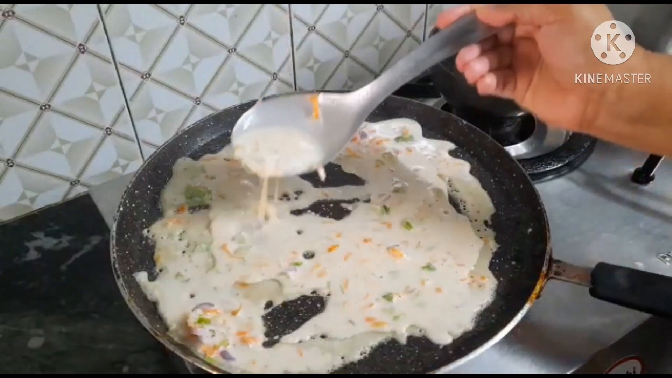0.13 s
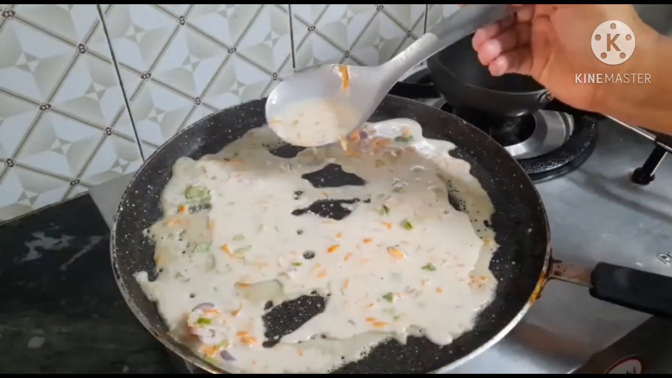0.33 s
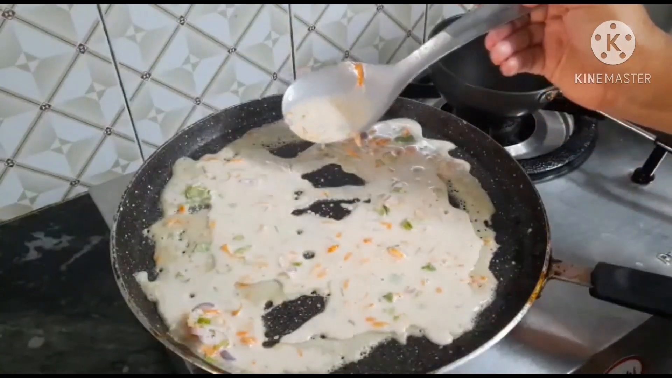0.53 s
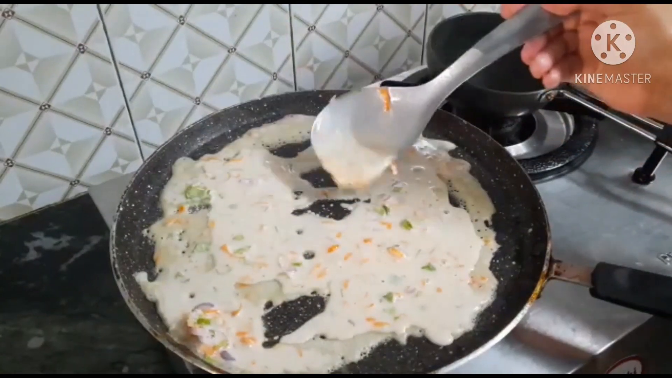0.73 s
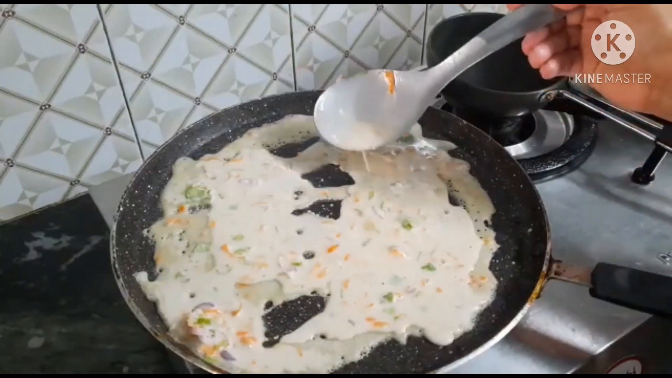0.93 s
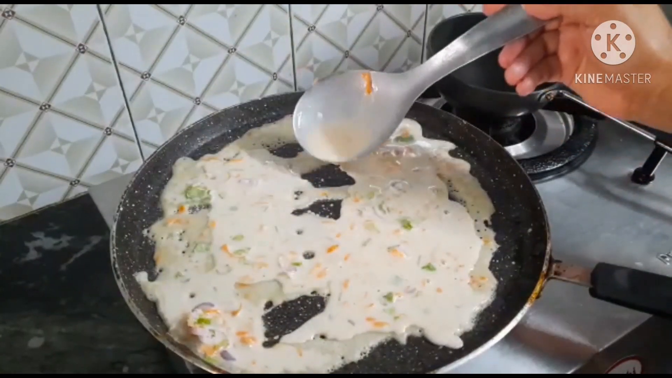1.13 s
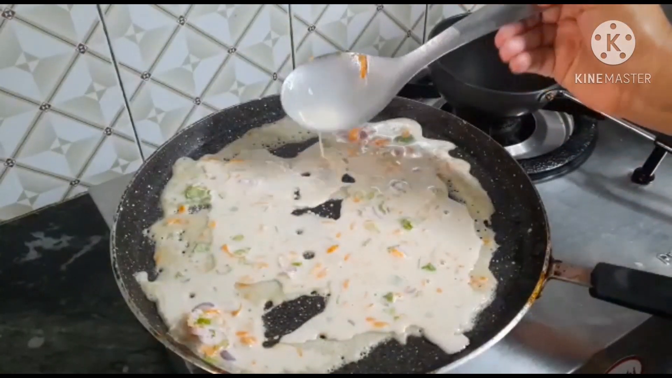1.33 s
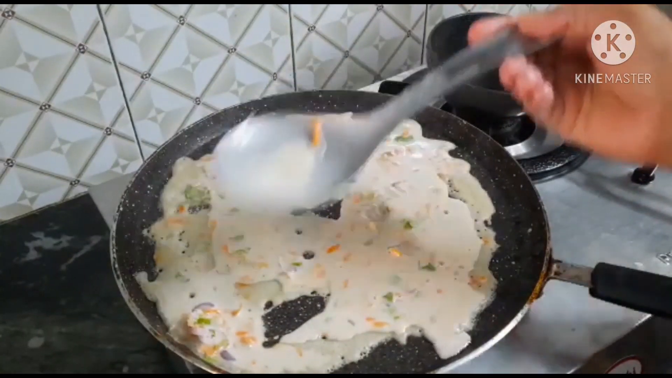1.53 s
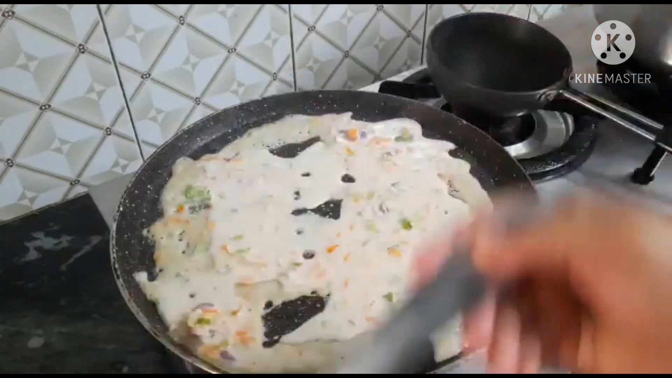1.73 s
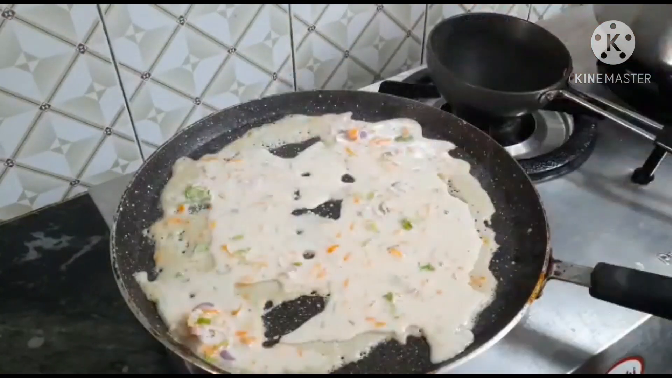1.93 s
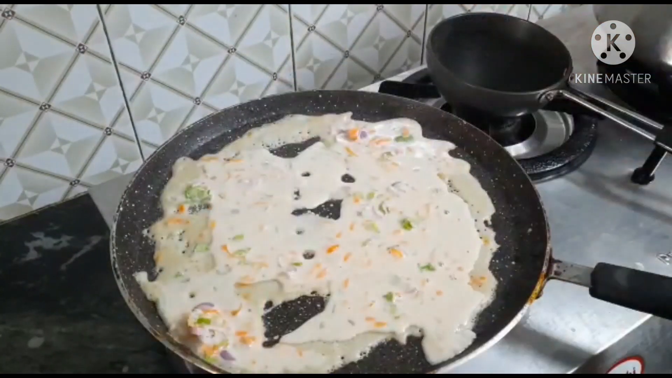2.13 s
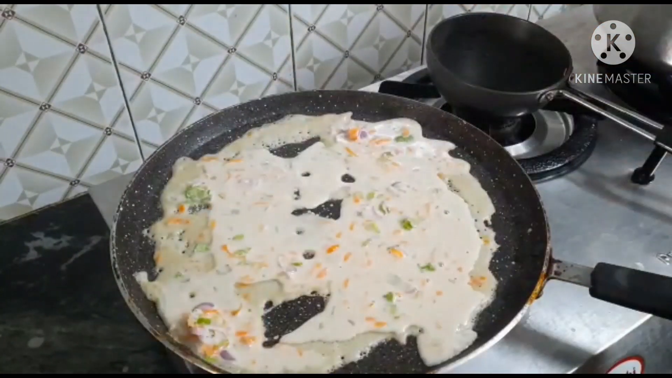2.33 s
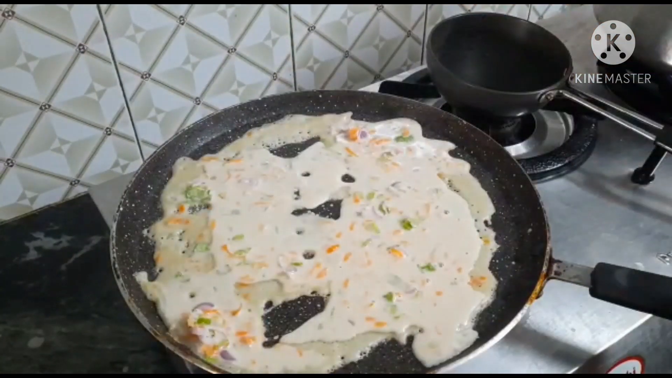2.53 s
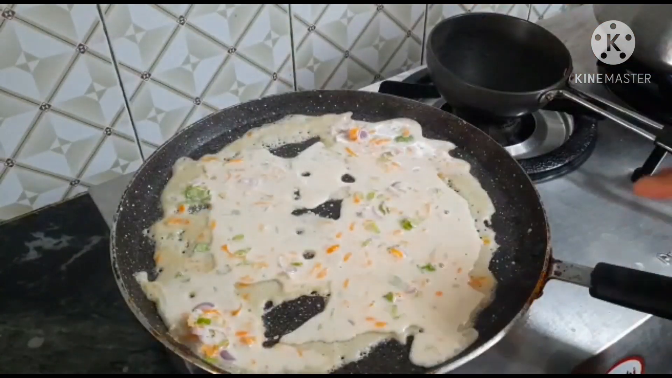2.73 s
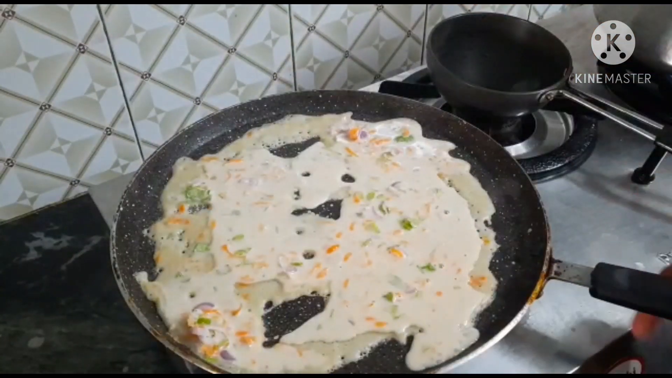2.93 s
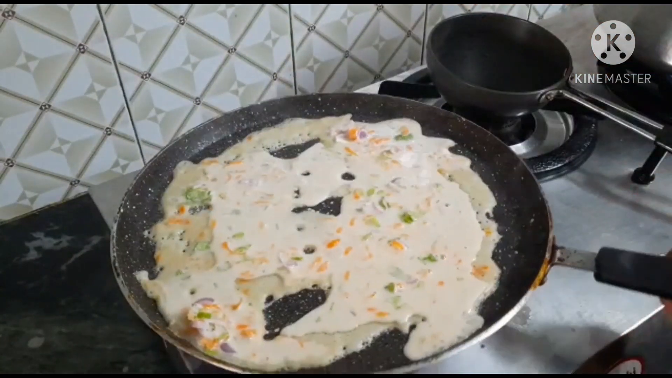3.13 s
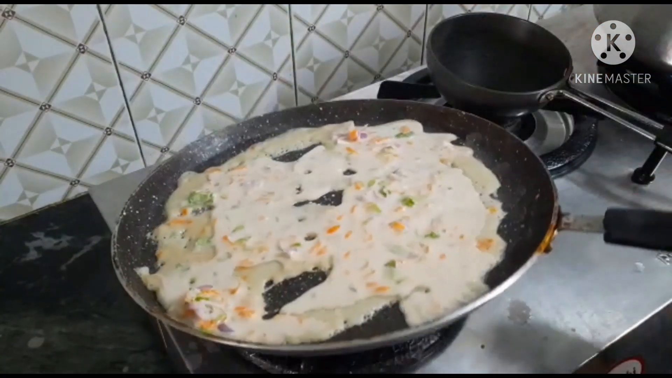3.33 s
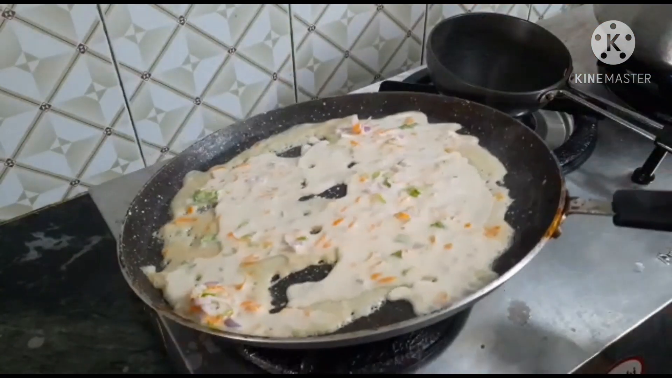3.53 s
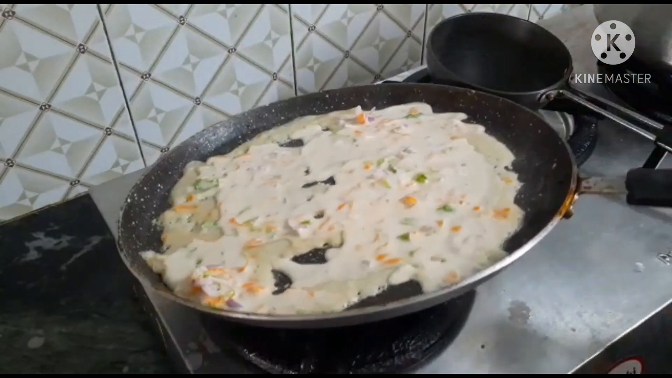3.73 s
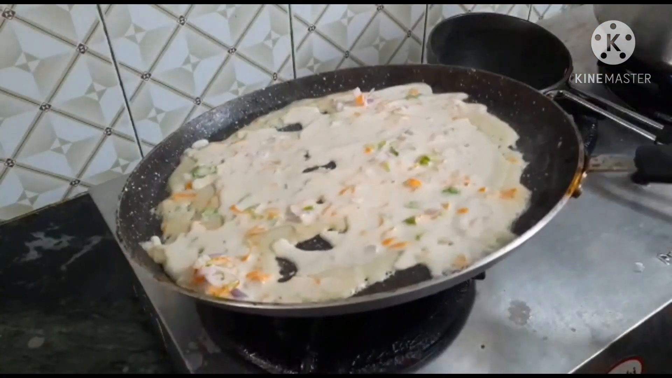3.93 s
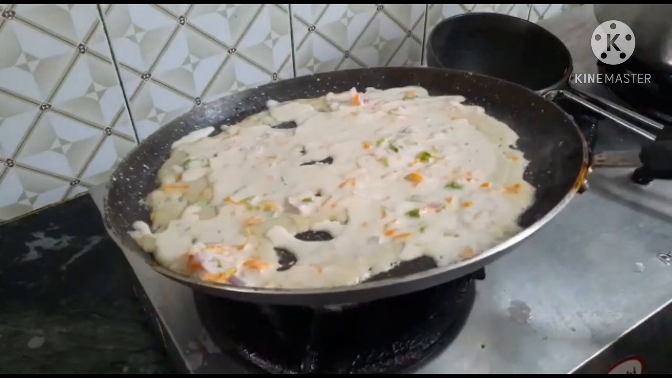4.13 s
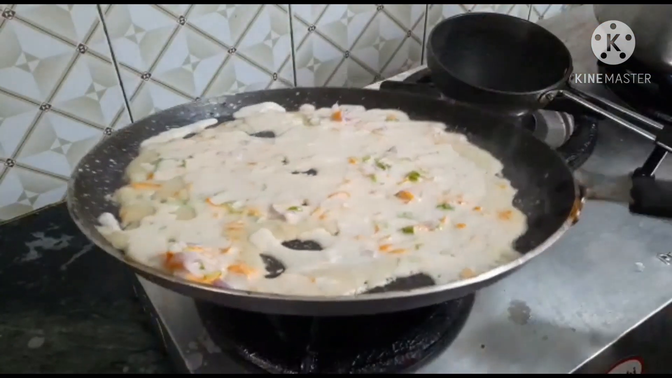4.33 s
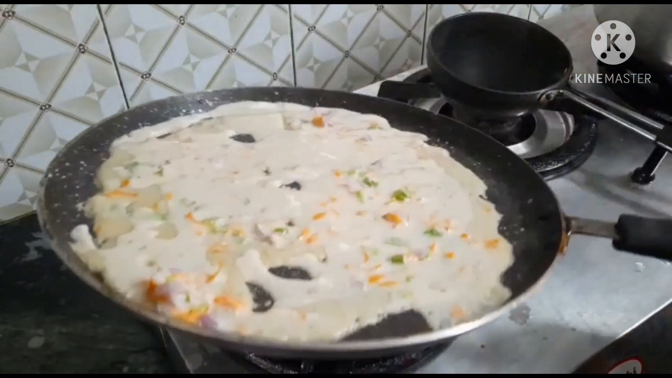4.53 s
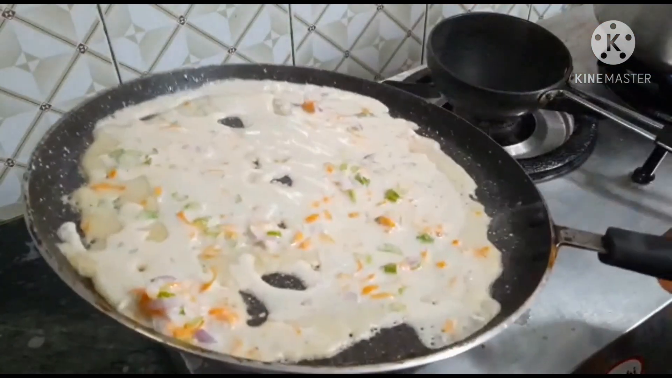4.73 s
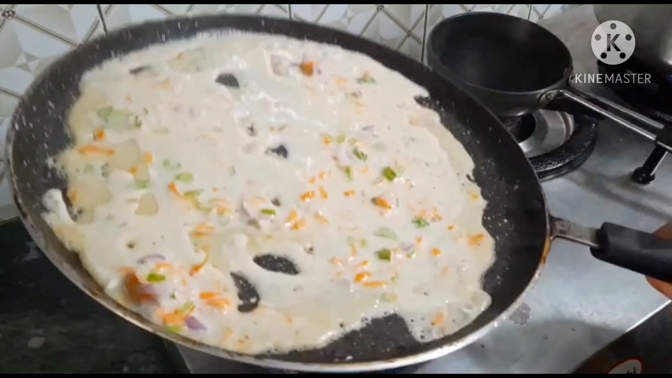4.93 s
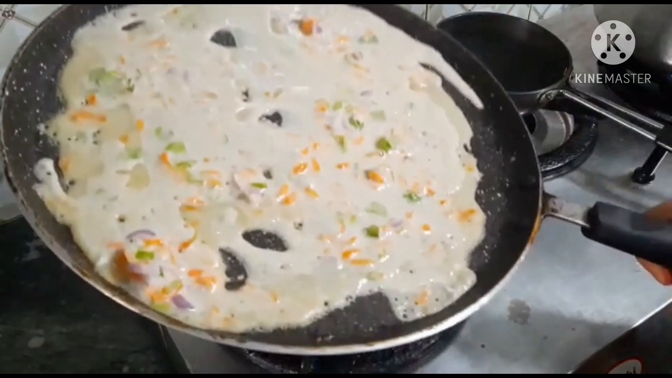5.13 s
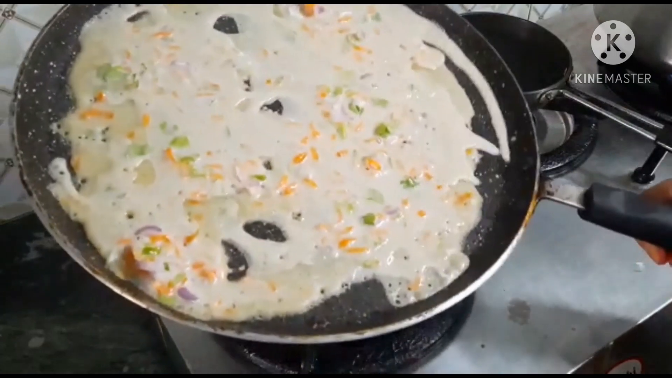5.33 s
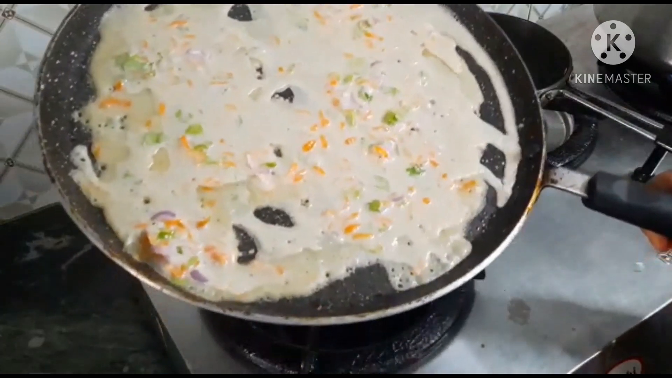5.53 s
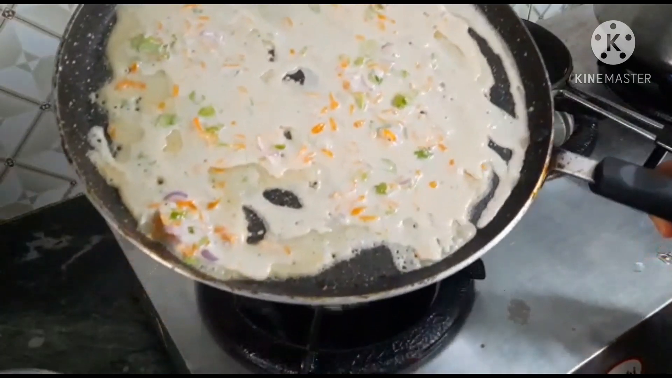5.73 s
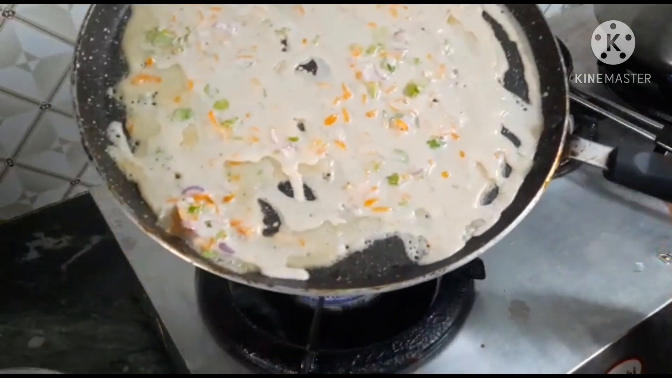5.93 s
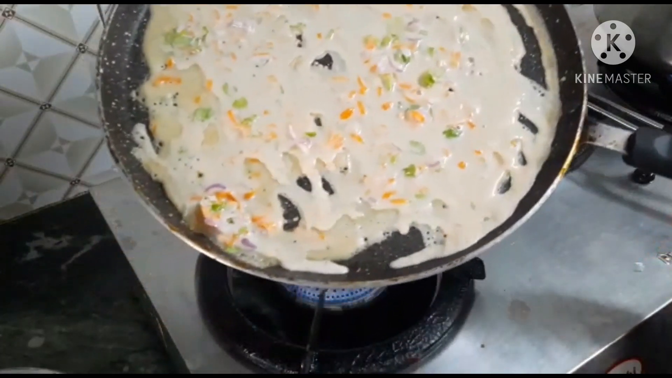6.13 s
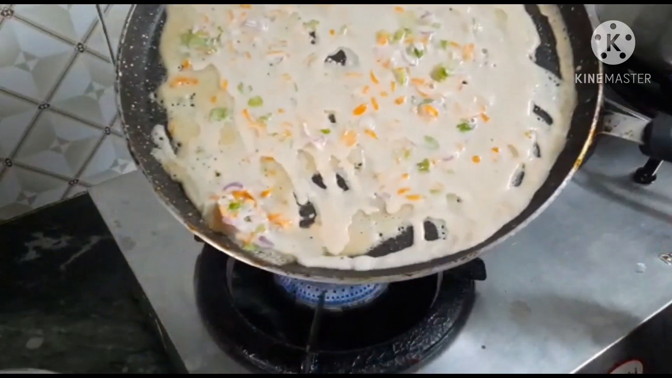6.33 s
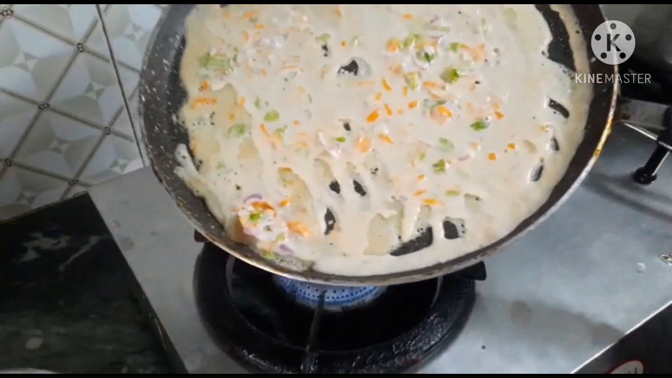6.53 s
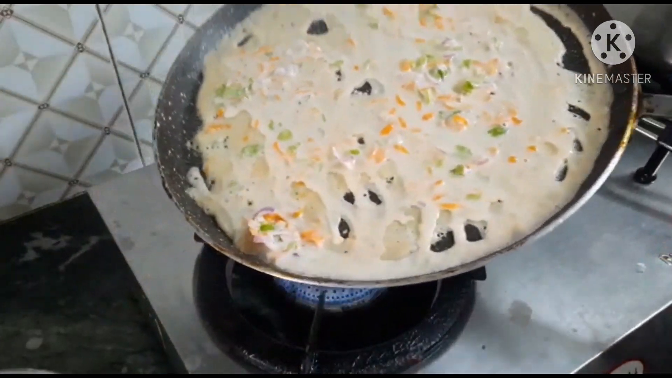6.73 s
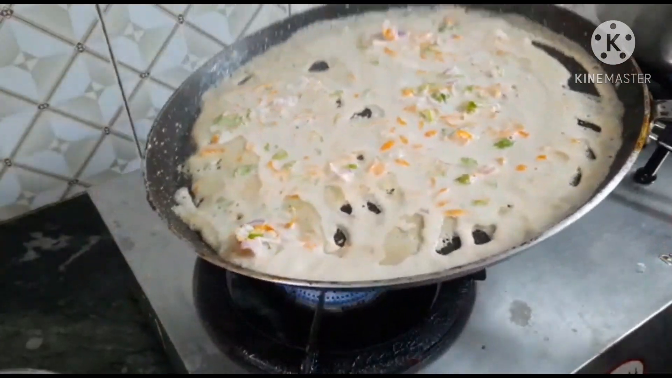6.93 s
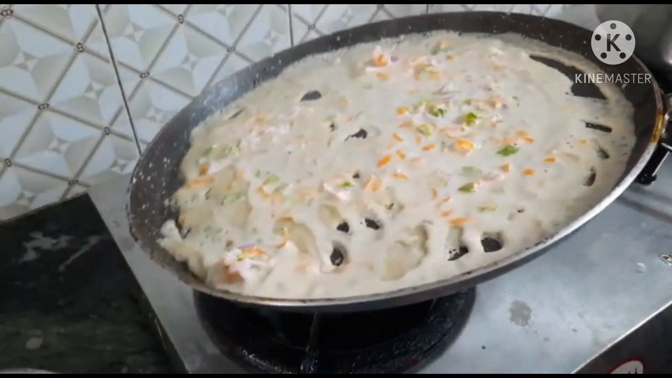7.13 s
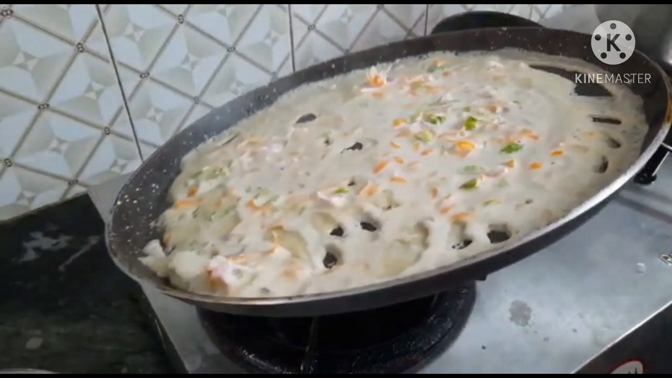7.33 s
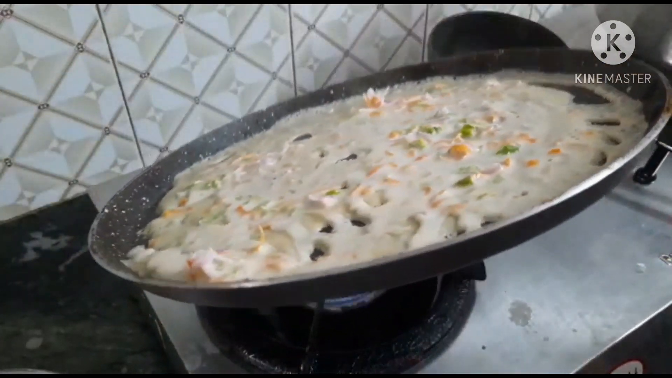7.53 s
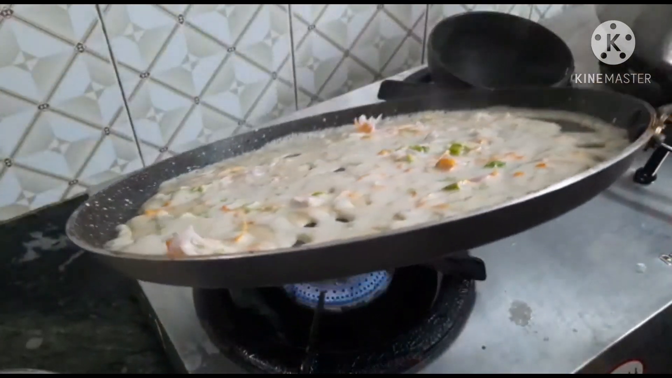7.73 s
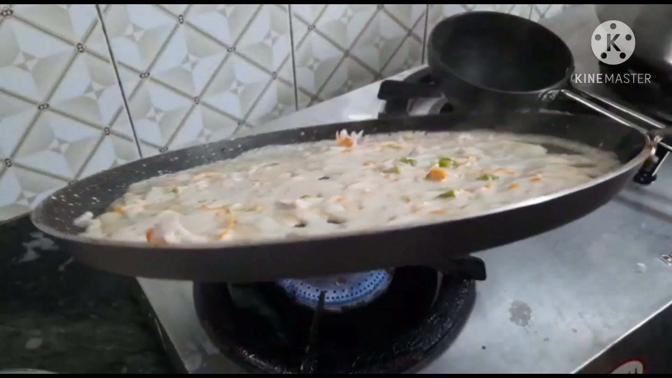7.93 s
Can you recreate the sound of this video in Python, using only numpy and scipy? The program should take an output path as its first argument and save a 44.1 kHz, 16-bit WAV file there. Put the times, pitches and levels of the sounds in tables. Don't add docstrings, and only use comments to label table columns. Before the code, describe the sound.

Thin batter sizzles softly on a hot pan, a metal ladle clanks loudly, then crackling oil spits as the sizzle swells and eases.

```python
import sys
import numpy as np
from scipy import signal
from scipy.fft import rfft, irfft
from scipy.io import wavfile

SR = 44100
rng = np.random.default_rng(int(sys.argv[2]) if len(sys.argv) > 2 else 0)


def store_pcm(level_fs):
    pcm = np.round(np.clip(level_fs, -1, 1) * 32767).astype(np.int16)
    wavfile.write(sys.argv[1], SR, np.atleast_2d(pcm).T)


def linear_from_db(decibels):
    return 10 ** (np.asarray(decibels, float) / 20)


N = 356724

# time in seconds, steam level in dB, oil spatter level in dB.
FRYING = [(0.0, -45, -61), (0.52, -47, -63.5), (0.67, -46, -63), (1.01, -50.5, -66), (1.71, -46.5, -60.5),
          (2.03, -47, -63), (2.46, -46.5, -60.5), (2.79, -47, -59), (3.31, -47.5, -59), (3.7, -46, -56),
          (4.08, -47, -57), (4.82, -44.5, -52.5), (5.5, -44.5, -50), (5.83, -39, -47.5),
          (6.08, -38.5, -47.5), (6.53, -38.5, -48), (7.89, -45.5, -53.5), (8.09, -45.5, -54)]
# frequency in Hz, density in dB per Hz.
STEAM_ROAR = [(700, -26), (1000, -15), (1250, -4), (1600, -2), (2050, -2.5), (2650, -2.5), (3050, -8.5),
              (3550, -17), (4200, -30.5)]
LARGE_BUBBLES = [(2180, -30.5), (3700, -10.5), (4480, -5), (7000, -3), (9100, -33), (15400, -120)]
SMALL_BUBBLES = [(5200, -11), (6500, -11), (7600, -0.5), (9000, 1), (10600, -1), (11800, -6), (13200, -13),
                 (15000, -28)]
FINE_SPRAY = [(11000, -26), (12500, -9), (13800, -5), (15000, -0.5), (15900, -6)]
# time in seconds, level in dB.
HUM_LEVEL = [
    (0, -75),
    (1.95, -69.5),
    (2.2, -65),
    (3.9, -64.5),
    (4.35, -71),
    (4.6, -63.5),
    (5.5, -62),
    (6.0, -75),
    (8.09, -77),
]
STEAM_MEAN_DB = -46


def rms_one(x):
    return x / np.sqrt(np.mean(x ** 2) + 1e-20)


def in_time(rows):
    s, *columns = np.transpose(rows)
    return [np.interp(np.arange(N) / SR, s, c) for c in columns]


def drift(rate_hz):
    r = np.exp(-2 * np.pi * rate_hz / SR)
    noise = rng.standard_normal(N + SR)
    return rms_one(signal.lfilter([1], [1, -2 * r, r * r], noise)[SR:])


def colour(x, spectrum):
    size = 8192
    hz, db = np.transpose(spectrum)
    hz = np.r_[hz[0] / 2, hz, hz[-1] * 2]
    db = np.r_[db[0] - 40, db, db[-1] - 40]
    log_hz = np.log(np.maximum(np.arange(size // 2 + 1), 1) * SR / size)
    cepstrum = irfft(np.log(linear_from_db(np.interp(log_hz, np.log(hz), db))))
    cepstrum[1:size // 2] *= 2
    cepstrum[size // 2 + 1:] = 0
    return signal.fftconvolve(x, irfft(np.exp(rfft(cepstrum))))[:len(x)]


def resonate(x, peaks, order=1):
    out = 0
    for k, (hz, width_hz, db) in enumerate(peaks):
        r = np.exp(-np.pi * max(width_hz, 3) / SR)
        section = [(1 - r * r) / 2, 0, (r * r - 1) / 2, 1, -2 * r * np.cos(2 * np.pi * hz / SR), r * r]
        sign = (-1) ** (k * order)
        out = out + sign * linear_from_db(db) * signal.sosfilt([section] * order, x)
    return out


def echo(tail_db, t60, size):
    t = np.arange(size) / SR
    air = signal.butter(3, 12500, fs=SR, output="sos")
    noise = signal.sosfilt(air, rng.standard_normal(size))
    low = signal.sosfilt(signal.butter(2, 6500, fs=SR, output="sos"), noise)
    tail = low * linear_from_db(-60 * t / t60) + (noise - low) * linear_from_db(-60 * t / (0.3 * t60))
    out = linear_from_db(tail_db) * (1 - np.exp(-t / 0.0032)) * tail
    out[0] = 1
    return out


def tiled_walls(x, tail_db, t60, wander_db, count):
    spots = [linear_from_db(wander_db * drift(1.0)) for k in range(count)]
    total = np.sqrt(sum(spot ** 2 for spot in spots))
    out = 0
    for k, spot in enumerate(spots):
        part = np.roll(x, k * N // count)
        out = out + spot / total * signal.fftconvolve(part, echo(tail_db, t60, size=16000))[:N]
    return rms_one(out)


def bursts(per_s, spread_db, clump_db):
    sizes = linear_from_db(spread_db * np.minimum(rng.exponential(1, N), 5)) * rng.choice([-1, 1], N)
    born = rng.random(N) < per_s * linear_from_db(clump_db * drift(25)) / SR
    return sizes * born / np.sqrt(per_s)


def knock(hits, body, contact_hz, rise_s):
    size = 24000
    out = np.zeros(N + SR)
    soft = signal.butter(3, contact_hz, fs=SR, output="sos")
    swell = 1 - np.exp(-np.arange(1, size + 1) / SR / rise_s)
    for s, peak_db, tail_db, t60 in hits:
        blow = signal.sosfilt(soft, echo(tail_db, t60, size))
        sound = swell * resonate(blow, body, order=2)
        out[round(s * SR):][:size] += linear_from_db(peak_db) * sound / np.abs(sound).max()
    return out[:N]


def low_pass(x, hz):
    return signal.sosfilt(signal.ellip(12, .5, 60, hz, fs=SR, output="sos"), x)


def sizzle():
    # frequency in Hz, width in Hz, level in dB.
    steam_jet = [(2150, 790, 0)]
    roar_db, oil_db = in_time(FRYING)
    swing_db = oil_db + 58
    grains = rms_one(bursts(2800, spread_db=9.0, clump_db=1.5))
    pops = rms_one(bursts(130., spread_db=3.0, clump_db=4.0))
    hiss = tiled_walls(rng.standard_normal(N), tail_db=-24.5, t60=0.077, wander_db=6.0, count=4)
    surge, sputter = drift(3.7), drift(86)
    layers = ((roar_db, STEAM_ROAR, -9, -14, .3, 1.1),
              (-62.5 + 0.93 * swing_db, LARGE_BUBBLES, -7, -11, .4, .9),
              (-57 + 1.16 * swing_db, SMALL_BUBBLES, -7, -9, .4, 1.1),
              (-71 + 1.3 * swing_db, FINE_SPRAY, -8, -12, .4, .7))
    out = 0
    for level_db, spectrum, grain_db, pop_db, surge_db, sputter_db in layers:
        own_hiss = np.roll(hiss, rng.integers(N))
        source = linear_from_db(grain_db) * grains + linear_from_db(pop_db) * pops + own_hiss
        flicker_db = surge_db * surge + sputter_db * sputter + 0.067 * drift(40)
        out = out + linear_from_db(level_db + flicker_db) * rms_one(colour(source, spectrum))
    jet_db = -61 + 2 * (roar_db - STEAM_MEAN_DB) + 0.46 * sputter
    return out + linear_from_db(jet_db) * rms_one(resonate(hiss[::-1], steam_jet, order=2))


def pour():
    # start in seconds, level in dB, hold in seconds.
    puffs = [
        (0.0, -58, 0.19),
        (0.234, -61.5, 0.042),
        (0.427, -52.5, .27),
        (0.81, -58, 0.034),
        (0.953, -63, .04),
        (1.078, -61.5, .17),
        (1.467, -62, 0.14),
    ]
    # frequency in Hz, width in Hz, level in dB.
    puff_peak = [(9800, 6000, 0)]
    t = np.arange(N) / SR
    level = 0
    for s, db, hold_s in puffs:
        rise = np.clip((t - s) / (0.45 * hold_s), 0, 1)
        fade_db = 90 * np.clip(t - s - hold_s, 0, 1)
        level = level + linear_from_db(db - fade_db) * rise
    spray = rng.standard_normal(N) + linear_from_db(0.5) * rms_one(bursts(900., spread_db=0.5, clump_db=3.5))
    return level * rms_one(resonate(spray, puff_peak, order=2))


def appliance_hum():
    # frequency in Hz, width in Hz, level in dB.
    room_modes = [(58, 7.3, -7.5), (95, 5.3, -4), (113.5, 17, 7), (138, 40, -2)]
    hum_db, = in_time(HUM_LEVEL)
    return linear_from_db(hum_db + drift(3.0)) * rms_one(resonate(rng.standard_normal(N), room_modes))


def gas_ring():
    # frequency in Hz, density in dB per Hz.
    murmur = [(94, -16.5), (160, -7.5), (242, -9.5), (311, -2), (415, -5.5), (523, -7.5), (560, 9),
              (730, -21.5), (1230, -120)]
    # frequency in Hz, density in dB per Hz.
    gas_jets = [(290, -41.5), (500, -19.5), (561, -12), (1070, -8.5), (1150, -12), (1500, -21),
                (2530, -120)]
    swing_db = in_time(FRYING)[0] - STEAM_MEAN_DB
    hum_swing_db = in_time(HUM_LEVEL)[0] + 68
    flame_db = -66.5 + 0.68 * swing_db + 0.35 * hum_swing_db + 0.53 * drift(8.8)
    gas_db = -57 + 0.81 * swing_db + 0.47 * drift(30)
    flame = linear_from_db(flame_db) * rms_one(colour(rng.standard_normal(N), murmur))
    return flame + linear_from_db(gas_db) * rms_one(colour(rng.standard_normal(N), gas_jets))


def far_rumble():
    # frequency in Hz, density in dB per Hz.
    rumble_spectrum = [(13, -46), (22, -32), (43, 8.5), (75, 7), (107, 4.5), (140, -43), (200, -16),
                       (260, -56), (440, -120)]
    return linear_from_db(-78) * rms_one(colour(rng.standard_normal(N), rumble_spectrum))


def tap():
    # frequency in Hz, width in Hz, level in dB.
    tap_modes = [(107, 26, 0), (228, 36, -7), (320, 104, -0.5), (550, 89, -3), (740, 110, -2),
                 (960, 180, -7), (1260, 450, -3)]
    # start in seconds, peak in dB, echo tail in dB, tail T60 in seconds.
    tap_hits = [
        (0.0, -49, -7, 1),
        (4.8895, -31, -29, 0.26),
        (4.915, -33.5, -33, 0.38),
    ]
    return knock(tap_hits, tap_modes, contact_hz=2200, rise_s=.0007)


def drip():
    # frequency in Hz, width in Hz, level in dB.
    drip_modes = [(1160, 77, 5), (1340, 930, 8), (1690, 130, -8), (2220, 750, -1)]
    # start in seconds, peak in dB, echo tail in dB, tail T60 in seconds.
    drip_hits = [
        (.247, -31.5, -26, 0.1),
        (.262, -36, -28, 0.25),
        (.278, -38, -32, 1),
    ]
    return knock(drip_hits, drip_modes, contact_hz=3500, rise_s=0.0027)


def spits():
    # time in seconds, peak in dB, body under 4 kHz in dB.
    clear_spits = [(0.8207, -32, -5), (1.5707, -35, -11), (1.7569, -35, -8), (2.169, -32.5, -9),
                   (2.4384, -40, -5), (2.481, -37, -8), (2.6569, -36, -5), (2.812, -35, -5),
                   (2.8749, -46, -7), (3.3358, -30, -5), (3.384, -33, -5), (3.5252, -28.5, 0),
                   (3.5865, -29.5, -12), (3.7632, -29, 3), (4.181, -24, -1.5), (4.246, -27.5, -3),
                   (4.283, -30, -8), (4.4288, -28, -16), (4.9383, -24, -2.5), (5.3018, -31, -3),
                   (5.4753, -30, 3), (5.5468, -23, -0.5), (5.7202, -25, -9), (5.857, -22, 1),
                   (5.9613, -21.5, -1), (6.098, -24, -5), (6.3087, -23, 1), (6.4097, -19.5, -11),
                   (6.48, -25, -15), (6.7042, -23, 0)]
    oil_db = in_time(FRYING)[1]
    small = np.flatnonzero(rng.random(N) < 14 / SR)
    setting_s = np.maximum(np.arange(N) / SR - 6.9, 0)
    small_db = oil_db + 19 + 6.3 * rng.uniform(-1.3, 1, N) - 12 * setting_s
    rows = [(round(s * SR), db, body_db) for s, db, body_db in clear_spits]
    rows += [(i, small_db[i], -15) for i in small]
    high, low = np.zeros((2, N + SR))
    for i, peak_db, body_db in rows:
        spit = linear_from_db(peak_db) * echo(-12.5, 0.07, size=4000)
        high[i:][:len(spit)] += spit
        low[i:][:len(spit)] += linear_from_db(body_db) * spit
    lag = round(.0026 * SR)
    high = high + linear_from_db(-4.5) * np.roll(high, lag)
    low = low + linear_from_db(-4.5) * np.roll(low, lag)
    out = linear_from_db(9.5) * colour(high, SMALL_BUBBLES) + linear_from_db(-4) * colour(high, LARGE_BUBBLES)
    out = out + linear_from_db(-11) * colour(high, FINE_SPRAY) + linear_from_db(13) * colour(low, STEAM_ROAR)
    return out[:N]


def bowl():
    # frequency in Hz, width in Hz, level in dB.
    bowl_modes = [(104.3, 12, 0.5), (165, 71, -10), (246, 53, -8.5), (405, 85, -6.5), (764, 42, -0.5),
                  (907, 137, 6.5), (1250, 190, -10), (1553, 350, -4), (1885, 250, -7.5), (2410, 440, -10),
                  (3140, 350, -14)]
    # start in seconds, peak in dB, echo tail in dB, tail T60 in seconds.
    bowl_hits = [
        (1.162, -21, -30, 0.26),
        (1.168, -29, -28.5, 0.62),
        (1.184, -26, -36, 0.29),
    ]
    return knock(bowl_hits, bowl_modes, contact_hz=3000, rise_s=0.0016)


def plop():
    # frequency in Hz, width in Hz, level in dB.
    plop_modes = [(556, 46, -1), (4670, 290, -23)]
    # start in seconds, peak in dB, echo tail in dB, tail T60 in seconds.
    plop_hits = [
        (1.630, -40.5, -31.5, 0.19),
    ]
    return knock(plop_hits, plop_modes, contact_hz=6000, rise_s=.001)


def ladle_down():
    # frequency in Hz, width in Hz, level in dB.
    ladle_modes = [(101, 9.5, 3.5), (188, 60, -12), (302, 140, -9), (381, 64, -8), (668, 97, -6),
                   (865, 59, 1), (1038, 105, 5.5), (1550, 450, -2), (1816, 330, -2), (2240, 720, -5)]
    # start in seconds, peak in dB, echo tail in dB, tail T60 in seconds.
    ladle_hits = [
        (2.204, -24, -30.5, 0.19),
        (2.225, -30.5, -28, 0.34),
        (2.26, -33.5, -31, .3),
        (2.322, -42, -31, 0.17),
    ]
    return knock(ladle_hits, ladle_modes, contact_hz=3300, rise_s=0.0026)


def ladle_clank():
    # frequency in Hz, width in Hz, level in dB.
    clank_modes = [(636, 350, -9.5), (1292, 200, 7), (1424, 300, 0.5), (1590, 230, -5), (2200, 420, 4.5),
                   (2430, 190, 1), (2780, 73, 1), (2852, 110, 6.5), (3530, 490, -28), (4170, 900, -25),
                   (4940, 620, -13), (5770, 960, -9.5), (7030, 430, -9.5), (9060, 1900, -16.5),
                   (10200, 3300, -14.5), (15000, 3000, -17)]
    # start in seconds, peak in dB, echo tail in dB, tail T60 in seconds.
    clank_hits = [
        (2.5115, -9, -25.5, 0.33),
        (2.5148, -15, -35, 0.63),
        (2.53, -27, -24, 0.59),
        (2.548, -34, -35, .35),
        (2.569, -22, -18, 0.29),
        (2.688, -36, -36, 0.18),
    ]
    return knock(clank_hits, clank_modes, contact_hz=12600, rise_s=0.00025)


def handle():
    # frequency in Hz, width in Hz, level in dB.
    handle_modes = [(103, 40, -5), (200, 39, -8.5), (308, 75, -1), (426, 29, -4), (586, 38, -2)]
    # start in seconds, peak in dB, echo tail in dB, tail T60 in seconds.
    handle_hits = [
        (2.6, -52.5, -18.5, 0.45),
        (3.3, -62, -15, 0.85),
        (3.503, -50, -25, 0.27),
        (3.679, -49, -6, 0.31),
        (5.53, -45, -27, 0.29),
        (5.58, -43, -19, 0.17),
        (5.615, -49.5, -15, 0.31),
        (5.75, -52.5, -29, .2),
    ]
    return knock(handle_hits, handle_modes, contact_hz=1000, rise_s=.02)


def pan_stand():
    # frequency in Hz, width in Hz, level in dB.
    stand_modes = [(102, 20, -14), (119, 23, 6), (136, 24, 3.5), (207, 39, 4), (300, 140, -2),
                   (448, 100, 2.5), (620, 140, -6), (754, 120, 2), (839, 54, 4.5), (899, 69, 4),
                   (990, 49, 2), (1120, 170, -1), (1840, 820, -11)]
    # start in seconds, peak in dB, echo tail in dB, tail T60 in seconds.
    stand_hits = [
        (2.917, -20, -25, 0.28),
        (2.927, -35, -7, 0.4),
        (2.947, -27.5, -24.5, 0.56),
        (3.168, -45, -32, 0.16),
    ]
    return knock(stand_hits, stand_modes, contact_hz=1550, rise_s=0.0018)


def scene():
    steady = sizzle() + pour() + appliance_hum() + gas_ring() + far_rumble() + spits()
    knocks = tap() + drip() + bowl() + plop() + ladle_down() + ladle_clank() + handle() + pan_stand()
    mid = low_pass(steady, 15780) + low_pass(knocks, 16300)
    bass = signal.sosfilt(signal.butter(2, 300, fs=SR, output="sos"), mid)
    side = linear_from_db(-22.5) * bass * drift(44)
    return np.array([mid + side, mid - side])


def top_cut(x):
    return signal.sosfilt(signal.butter(12, 16480, fs=SR, output="sos"), x)


def record(dry):
    return top_cut(dry)


dry = scene()
out = record(dry)
store_pcm(out)
```